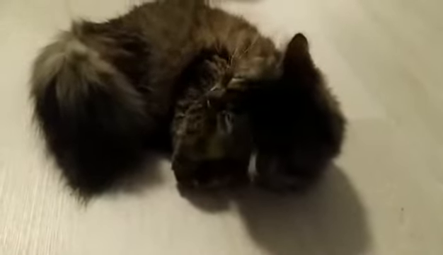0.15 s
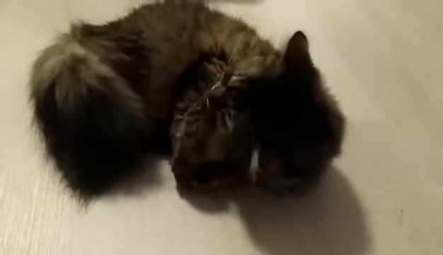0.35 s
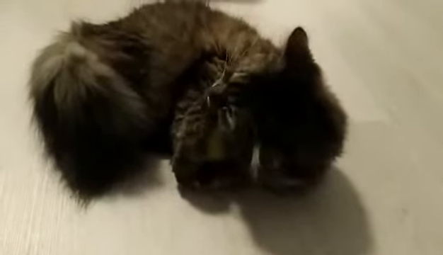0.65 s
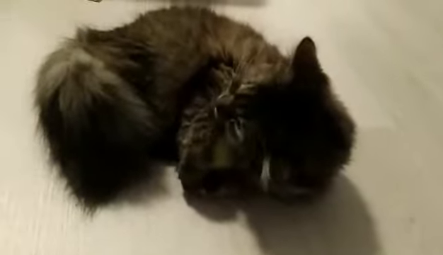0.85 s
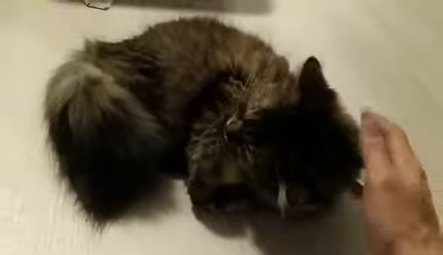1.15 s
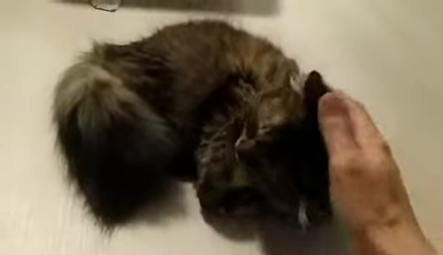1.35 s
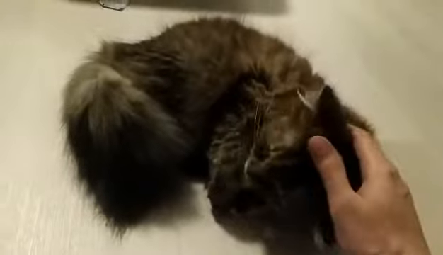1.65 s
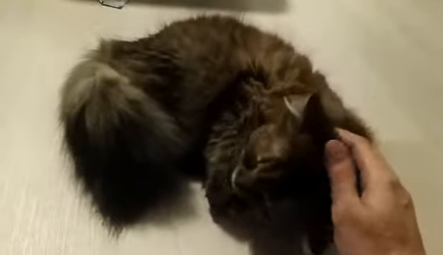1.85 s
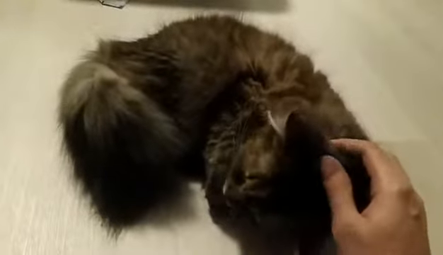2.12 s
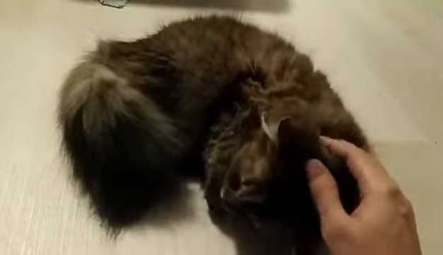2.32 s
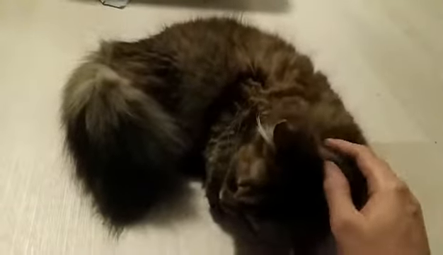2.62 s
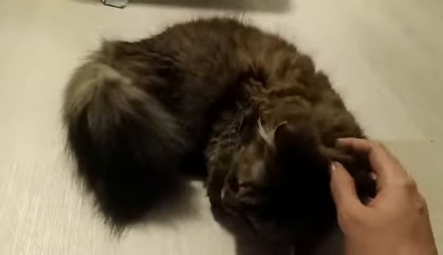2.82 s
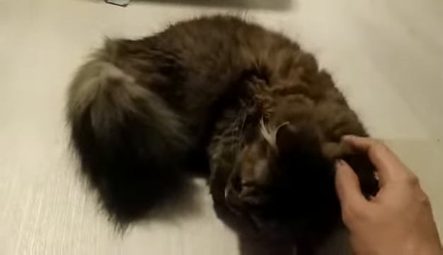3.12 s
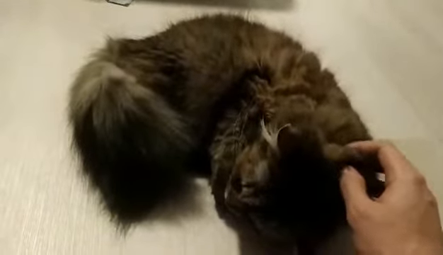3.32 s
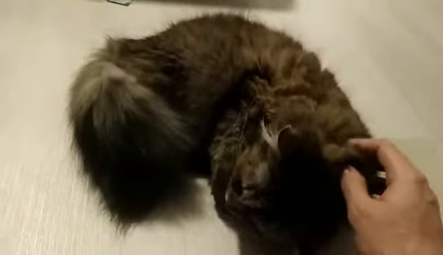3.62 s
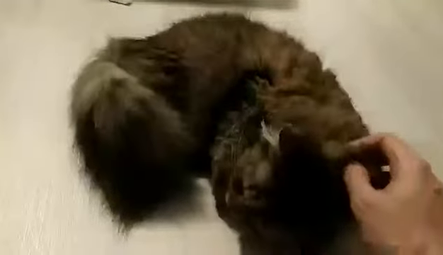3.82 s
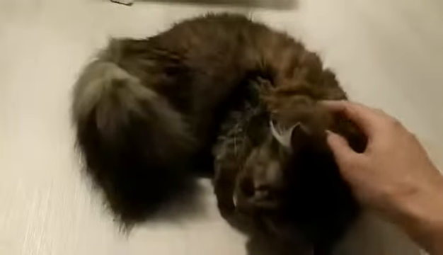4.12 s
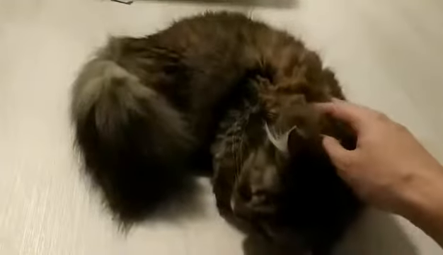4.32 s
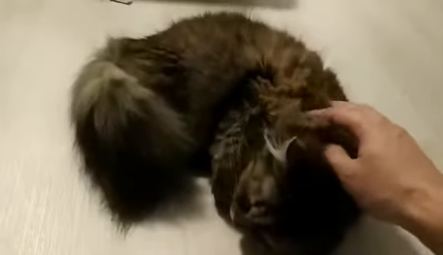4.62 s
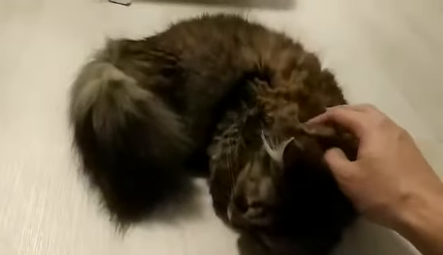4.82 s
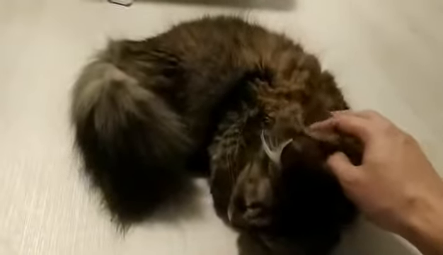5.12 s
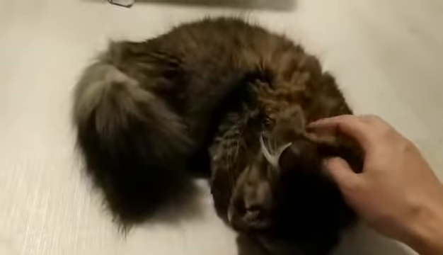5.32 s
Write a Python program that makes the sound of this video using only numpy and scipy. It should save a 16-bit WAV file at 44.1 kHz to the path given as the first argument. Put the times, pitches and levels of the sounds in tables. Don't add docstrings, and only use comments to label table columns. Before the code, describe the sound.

A small bare room with faint far-off motor hum and soft microphone hiss, slightly watery from noise reduction. At about 0.1 s a cat, an arm's length away, starts a closed-mouth warning yowl: a muffled mid-pitched tone fluttering very fast, with a little nasal ring and breathy rasp, sinking slightly and ending at 0.67 s in a small throat click. Cloth rustle of a reaching sleeve swells from 0.2 s and stops around 1.3 s; a mouth tick pops near 1.0 s. The second yowl, the strongest, runs from 1.4 to 1.9 s, starting higher, falling while it flutters, and closing with a soft click. Only room hiss and hum remain until 3.6 s, when the third yowl enters lower and quavering, then from 3.9 s smooths out and climbs, faltering in loudness, ending near 4.3 s with a tiny tick. Short reflections follow each call; quiet background continues to the end.

```python
import sys
import numpy as np
from scipy import signal
from scipy.fft import rfft, irfft, next_fast_len
from scipy.io import wavfile
from scipy.ndimage import uniform_filter1d

SR = 44100
rng = np.random.default_rng(int(sys.argv[2]) if len(sys.argv) > 2 else 0)


def transcribe(u):
    v = np.clip(np.atleast_2d(u).T, -1, 1)
    q = np.round(v * 32767).astype(np.int16)
    wavfile.write(sys.argv[1], SR, q)


def decibels_to_gain(level_db):
    exponent = np.asarray(level_db, float) / 20
    return 10 ** exponent


N = 240830
TIME = np.arange(N) / SR
SIZE = next_fast_len(N)
HZ = np.fft.rfftfreq(SIZE, 1 / SR)


def read(table, hz):
    f, v = np.transpose(table)
    return np.interp(np.log(np.maximum(hz, 1)), np.log(f), v)


def walk(rate):
    k = int(SR / rate)
    held = np.repeat(rng.standard_normal(N // k + 1), k)
    return 1.087 * uniform_filter1d(uniform_filter1d(held, k), k)[:N]


def eased(s, values):
    place = np.interp(TIME, s, np.arange(len(s)))
    whole = np.floor(place)
    part = (1 - np.cos(np.pi * (place - whole))) / 2
    return np.interp(whole + part, np.arange(len(s)), values)


def bumps(events, width_s):
    return sum(size * np.exp(-((TIME - s) / width_s) ** 2) for s, size in events)


def coloured_noise(table, channels):
    return irfft(rfft(rng.standard_normal((channels, SIZE))) * decibels_to_gain(read(table, HZ)))[:, :N]


# frequency in Hz, level in dB per Hz.
AIR_COLOUR = [(24, -42), (40, -29), (124, -15), (187, -0.5), (271, -3), (298, -2.5), (337, -4.5),
              (410, -6.5), (476, -6), (945, -5), (1400, -13), (1790, -6.5), (10200, -9), (13000, -13.5),
              (14000, -96)]
# frequency in Hz, side minus mid in dB.
AIR_WIDTH = [(60, -8), (110, -12), (200, -7), (370, -6), (670, -3), (1220, 2.5), (2240, -2), (4090, -1),
             (7470, 2.5), (13600, 6)]
# frequency in Hz, left minus right in dB.
AIR_BALANCE = [(60, 4), (110, -1), (200, 0.5), (370, -2.5), (670, 0.5), (1220, -2), (2240, -2.5),
               (4090, -5.5), (7470, -7.5), (13600, -2)]


def air():
    mid, side = rfft(rng.standard_normal((2, SIZE))) * decibels_to_gain(read(AIR_COLOUR, HZ))
    side = side * decibels_to_gain(read(AIR_WIDTH, HZ))
    pan = decibels_to_gain(read(AIR_BALANCE, HZ) / 2)
    pair = np.array([(mid + side) * pan, (mid - side) / pan])
    pair = pair * decibels_to_gain(-51.24) / np.std(irfft(mid))
    quick = walk(40)
    flicker_db = 1.5 * (quick - uniform_filter1d(quick, size=SR // 9))
    swell = decibels_to_gain(0.04 * walk(4.24) + flicker_db)
    treble = np.clip(np.log2(np.maximum(HZ, 1) / 800) / 3, 0, 1)
    steady_part = irfft(pair * (1 - treble))[:, :N]
    treble_part = irfft(pair * treble)[:, :N] * swell
    hum_hz = 183 * (1 + 0.011 * walk(17))
    hum = decibels_to_gain(-72.5 + 0.8 * walk(6.4)) * np.sin(2 * np.pi * np.cumsum(hum_hz) / SR)
    return hum + steady_part + treble_part


# frequency in Hz, level in dB.
RASP_COLOUR = [(600, -52), (1100, -9.5), (1500, -19), (2000, -17.5), (3000, -75)]


def rasp(rough, tone_db, octave_db):
    noise = coloured_noise(RASP_COLOUR, 1)[0]
    return rough * decibels_to_gain(0.44 * tone_db + 0.3 * octave_db - 21.5) * noise / np.std(noise)


# opening in seconds, closing in seconds, level in dB.
NOSE_OPENINGS = [
    (.24, .5, -60),
    (3.955, 4.22, -55.5),
]


def nose(phase, hz):
    nose_hz, width_hz = 4500, 280
    attack_s, sag_db_s, release_s = .015, -12, .06
    level = 0
    for opens, closes, db in NOSE_OPENINGS:
        opening = np.clip((TIME - opens) / attack_s, 0, 1)
        closing = np.clip(1 - (TIME - closes) / release_s, 0, 1)
        level = level + opening * closing * decibels_to_gain(db + sag_db_s * np.maximum(TIME - opens, 0))
    level = level * decibels_to_gain(2.6 * walk(60))
    return sum(level * np.sin(k * phase) / (1 + ((k * hz - nose_hz) / width_hz) ** 2) for k in range(7, 11))


# crest in seconds, crest pitch in Hz,
# fall from crest to trough in seconds, trough pitch in Hz, accent in dB.
FIRST_FLUTTER = [(0.161, 553, 0.012, 379.7, 6.5), (0.185, 505.7, 0.014, 358.7, -3),
                 (0.217, 621, 0.015, 422.7, 2.5), (0.245, 543.3, 0.012, 434, 3.5),
                 (0.268, 586.6, 0.018, 404, 3), (0.299, 502, 0.0094, 425.7, -2),
                 (0.326, 602, 0.011, 397, -2), (0.35, 535.6, 0.0089, 447, 0.5),
                 (0.375, 505.7, 0.017, 433.6, 0.5), (0.403, 522.6, 0.021, 414.3, -1.5),
                 (0.433, 527.6, 0.016, 394.3, -0.5), (0.465, 499, 0.014, 412.4, 0.5),
                 (0.487, 482.6, 0.018, 453, 0), (0.517, 504.7, 0.017, 390.6, 1.7),
                 (0.546, 476, 0.014, 384, 3), (0.582, 457, 0.013, 427, 1), (0.608, 471, 0.013, 421.5, 2.5),
                 (0.634, 459, 0.018, 435.3, 2)]
SECOND_FLUTTER = [(1.387, 682, 0.0067, 399, -1), (1.406, 662, 0.014, 377, 0),
                  (1.436, 613, 0.0056, 450, 2.6), (1.459, 593, 0.011, 389, -7),
                  (1.485, 612.5, 0.016, 434.4, -2), (1.514, 569, 0.013, 433, 1),
                  (1.539, 559, 0.0054, 442.7, -1), (1.566, 581, 0.0055, 444.3, -0.5),
                  (1.594, 596, 0.014, 441.4, -1), (1.621, 489, 0.011, 429.5, -3),
                  (1.645, 535, 0.012, 418, -1), (1.675, 564.6, 0.0088, 401.4, 1.5),
                  (1.703, 513.7, 0.0085, 439, -3.5), (1.726, 524, 0.02, 433.4, 0),
                  (1.755, 528, 0.01, 458, -5), (1.777, 482.4, 0.013, 403.4, -1.5),
                  (1.806, 482, 0.024, 415.4, -0.7)]
THIRD_FLUTTER = [(3.608, 447, 0.0095, 322, -9), (3.633, 399.5, 0.016, 294, -5), (3.661, 416, 0.013, 304, 0),
                 (3.683, 388, 0.011, 296.5, -10), (3.71, 434, 0.0059, 408, -1),
                 (3.733, 461.4, 0.022, 360, 3), (3.764, 435, 0.013, 420, -2), (3.79, 444, 0.0074, 409, 1),
                 (3.816, 486, 0.0095, 380, 8), (3.843, 499, 0.018, 415, 1), (3.872, 508, 0.017, 413, 3.5),
                 (3.902, 523, 0.017, 446, 5)]
# time in seconds, pitch in Hz.
PITCH_SLIDES = [
    [(.097, 430), (.114, 637), (.132, 395), (.146, 372.5), (.659, 430), (.669, 293)],
    [(1.367, 400.4), (1.838, 452), (1.876, 434)],
    [(3.592, 426.5), (3.93, 507), (3.953, 514), (3.972, 458), (4.0, 485), (4.06, 476), (4.075, 506),
     (4.2, 567), (4.286, 586)],
]
# time in seconds, tone in dB, octave partial in dB.
BREATH = [
    [(.097, -51, -70), (.114, -47.5, -70), (.144, -47, -64), (.2, -40.5, -56), (.235, -42, -52.5),
     (.41, -39, -45), (.56, -41, -51), (.652, -40.5, -53), (.669, -42, -62)],
    [(1.367, -46, -64.5), (1.46, -39.5, -46), (1.6, -42, -45), (1.76, -36.5, -43.5), (1.79, -36, -43),
     (1.822, -35.5, -46.5), (1.845, -37.5, -53.5), (1.874, -38, -44)],
    [(3.592, -41, -61), (3.69, -41.5, -54.5), (3.769, -39.5, -56), (3.9, -41, -51), (3.945, -39, -52),
     (4.005, -36.5, -54), (4.13, -47.5, -50.5), (4.18, -40, -48), (4.286, -47, -51)],
]
# time in seconds, slip in Hz.
PITCH_SLIPS = [(4.018, -6), (4.033, 9), (4.108, 9), (4.128, -20), (4.16, -12), (4.24, 10)]
# time in seconds, change in dB.
TONE_NUDGES = [(.56, -10), (1.471, -4.5), (1.793, -10), (1.83, -5), (3.983, -9.5), (4.082, 2.5),
               (4.121, -6.5), (4.207, -9), (4.25, -14), (4.264, -8)]
# multiple of the pitch, dB relative to the octave when steady.
UPPER_PARTIALS = [(3, -12), (4, -11)]


def yowl(flutter, slide, effort):
    crest_s, crest_hz, fall_s, trough_hz, accent_db = np.transpose(flutter)
    glide_s, glide_hz = np.transpose(slide)
    effort_s, tone_effort_db, octave_effort_db = np.transpose(effort)
    turn_s = np.r_[glide_s, crest_s, crest_s + fall_s]
    order = np.argsort(turn_s)
    turn_s = turn_s[order]

    hz = eased(turn_s, np.r_[glide_hz, 1.03 * crest_hz, .99 * trough_hz][order])
    straight = uniform_filter1d(np.interp(TIME, glide_s, glide_hz), size=SR // 150)
    steady_from_s = glide_s[glide_s > crest_s[-1]][0]
    hz = np.where(TIME > steady_from_s, straight, hz)
    hz = hz + bumps(PITCH_SLIPS, .008)

    depth = np.maximum(np.log2(crest_hz / trough_hz), .01) ** 1.16
    slack = eased(turn_s, np.r_[0 * glide_s, 0 * depth, depth][order])
    rough = np.clip(4.06 * uniform_filter1d(slack, size=SR // 20), 0, 1)
    tremor = (0.003 + 0.009 * rough) * walk(160) + .004 * (1 - rough) * walk(40)
    phase = 2 * np.pi * np.cumsum(hz * (1 + tremor)) / SR

    shut = np.minimum(4 * depth, 1)
    choke_db = -18 * eased(turn_s - 0.0012, np.r_[0 * glide_s, 0 * shut, shut][order]) ** 1.6

    throat_hz, throat_width_hz = 428, 134
    throat_db = -10 * np.log10(1 + ((hz - throat_hz) / throat_width_hz) ** 2)
    throat_db = throat_db - uniform_filter1d(throat_db, size=SR // 12)
    tone_db = np.interp(TIME, effort_s, tone_effort_db) + np.interp(TIME, crest_s, 0.39 * accent_db)
    tone_db = tone_db + 2.5 + throat_db - 12 * slack ** 1.72 + 1.16 * walk(90)
    tone_db = tone_db + bumps(TONE_NUDGES, 0.0067)
    octave_db = np.interp(TIME, effort_s, octave_effort_db) + np.interp(TIME, crest_s, accent_db)
    octave_db = octave_db + 3.5 + 2.2 * rough + choke_db - 6 * slack + 1.1 * walk(70)

    sound = decibels_to_gain(tone_db) * np.sin(phase) + decibels_to_gain(octave_db) * np.sin(2 * phase - .4)
    lips_hz, lips_db_octave = 1360, -28
    for multiple, db in UPPER_PARTIALS:
        octaves_over = np.maximum(np.log2(multiple * hz / lips_hz), 0)
        muffle_db = (3 - 0.55 * rough) * lips_db_octave * octaves_over
        sound = sound + decibels_to_gain(octave_db + db + 6.2 * rough + muffle_db) * np.sin(multiple * phase)
    sound = sound + rasp(rough, tone_db, octave_db) + nose(phase, hz)
    fade_in = np.clip((TIME - glide_s[0]) / 0.0033, 0, 1)
    fade_out = np.clip((glide_s[-1] - TIME) / 0.0052, 0, 1)
    return sound * fade_in * fade_out


# delay in seconds, left level in dB, right level in dB.
NEAR_BOUNCES = [
    (.00055, -9, -40),
    (.0031, -30, -20),
    (.0074, -20, -40),
]
# delay in seconds, left level in dB, right level in dB.
FAR_SLAPS = [(.013, -24, -15), (.025, -11, -13), (.07, -25, -23), (.098, -19, -21), (.125, -22, -24),
             (.17, -20, -21)]
# frequency in Hz, level in dB.
TAIL_COLOUR = [(500, 1), (800, 0), (1200, -4), (4000, -6)]


def room(x):
    age = np.arange(SR) / SR
    early = decibels_to_gain(-60 * age / .08)
    late = decibels_to_gain(-11 - 60 * age / 0.8)
    shared, own = rng.standard_normal(SR), rng.standard_normal((2, SR))
    tail = (shared + own) * (early + late) * np.clip((age - .008) / 0.011, 0, 1)
    tail = tail * decibels_to_gain(-18) / np.sqrt(np.sum(tail ** 2, axis=1, keepdims=True))
    tail = irfft(rfft(tail) * decibels_to_gain(read(TAIL_COLOUR, np.fft.rfftfreq(SR, 1 / SR))))
    pan_db = -0.8
    out = x * decibels_to_gain(np.array([[pan_db], [-pan_db]]) / 2)
    dull = signal.sosfilt(signal.butter(2, 800, fs=SR, output="sos"), x)
    for echoes, sound in ((NEAR_BOUNCES, x), (FAR_SLAPS, dull)):
        for delay_s, *db in echoes:
            out = out + decibels_to_gain(np.array(db))[:, None] * np.interp(TIME - delay_s, TIME, sound)
    return out + signal.fftconvolve(x[None], tail, axes=1)[:, :N]


# frequency in Hz, level in dB per Hz.
CLOTH_COLOUR = [(150, -23), (400, -2.5), (1500, -6.5), (4000, -7), (10000, -1), (12800, -7), (13300, -50)]


def rustle():
    starts_s, swell_s, stops_s, release_s = 0.17, 1, 1.27, 0.084
    cloth = coloured_noise(CLOTH_COLOUR, 2)
    swell = np.clip((TIME - starts_s) / swell_s, 0, 1)
    stop = np.clip(1 - (TIME - stops_s) / release_s, 0, 1)
    blend = (cloth + 0.5 * cloth[::-1]) / np.std(cloth)
    return blend * swell * stop * decibels_to_gain(-52.5 + 2.2 * walk(24.1))


# start in seconds, peak in dB, pitch in Hz, time to fall 60 dB in seconds.
MOUTH_CLICKS = [
    (0.663, -39.5, 260, 0.045),
    (0.985, -30.5, 658, 0.0064),
    (1.408, -40, 3440, 0.01),
    (1.875, -43, 270.8, 0.052),
    (4.281, -43, 1460, 0.012),
]


def clicks():
    out = 0
    for s, db, hz, t60 in MOUTH_CLICKS:
        age = np.maximum(TIME - s, 0)
        swell = np.minimum(age * hz, 1)
        out = out + decibels_to_gain(db - 60 * age / t60) * swell * np.sin(2 * np.pi * hz * age)
    return out


def scene():
    flutters = FIRST_FLUTTER, SECOND_FLUTTER, THIRD_FLUTTER
    cat = sum(yowl(*call) for call in zip(flutters, PITCH_SLIDES, BREATH)) + clicks()
    left, right = room(cat) + air() + rustle()
    return np.array([np.roll(left, 1), right])


def thin_out(x, cut_db, band_count=8, frame_count=2):
    turn = np.array([[1, 0.9], [1, -1.003]]) / np.sqrt(2)
    hz, _, cells = signal.stft(turn @ x, SR, window="cosine", nperseg=2048)
    power = np.abs(cells) ** 2 + 1e-30
    usual = uniform_filter1d(np.median(power, axis=2, keepdims=True), size=15, axis=1)
    chance = rng.standard_normal((2, len(hz) // band_count + 1, cells.shape[2]))
    patch = np.repeat(chance, band_count, axis=1)[:, :len(hz)]
    patch = uniform_filter1d(patch, size=frame_count, axis=2)
    threshold = usual * decibels_to_gain(2 * (read(cut_db, hz)[:, None] + 10.3 * patch))
    gain = np.sqrt(np.maximum(1 - (threshold / power) ** 1.8, .004))
    return turn @ signal.istft(cells * gain, SR, window="cosine", nperseg=2048)[1][:, :N]


def top_cut(x):
    return signal.sosfilt(signal.butter(12, 13550, fs=SR, output="sos"), x)


def record(dry):
    x = signal.sosfilt(signal.butter(2, 90, "high", fs=SR, output="sos"), dry)
    x = thin_out(x, [(700, -14), (1500, -4.5), (4000, -0.5), (7000, -4.5), (12500, 2.0)])
    return top_cut(x)


dry = scene()
out = record(dry)
transcribe(out)
```